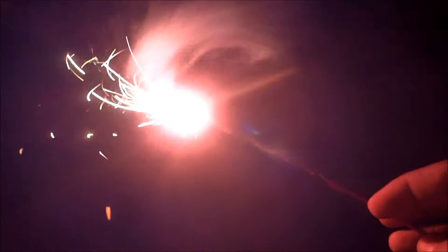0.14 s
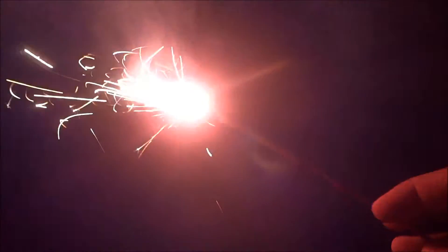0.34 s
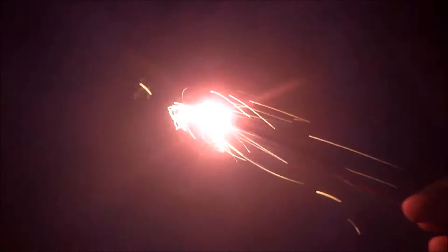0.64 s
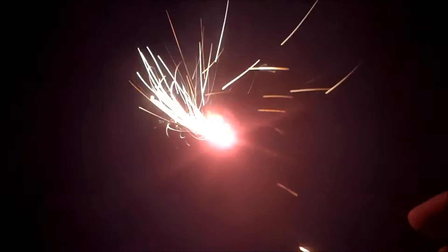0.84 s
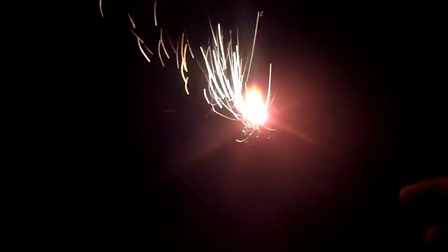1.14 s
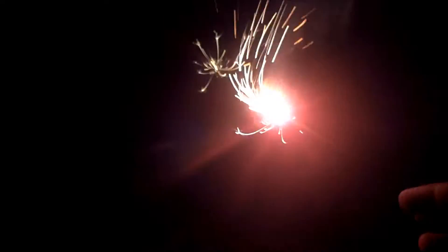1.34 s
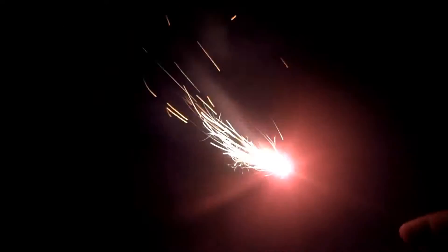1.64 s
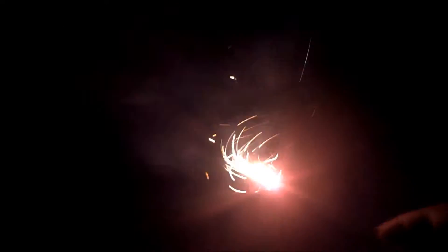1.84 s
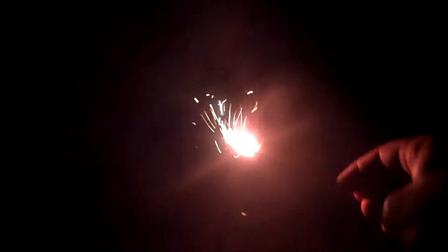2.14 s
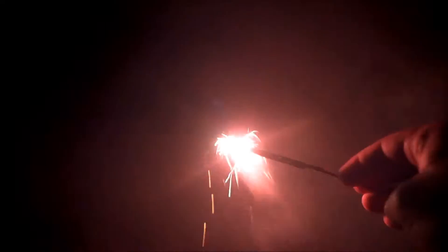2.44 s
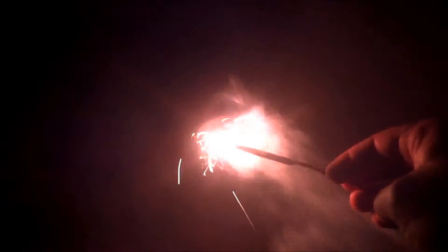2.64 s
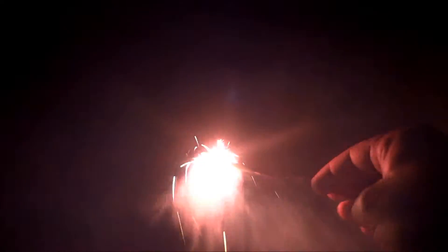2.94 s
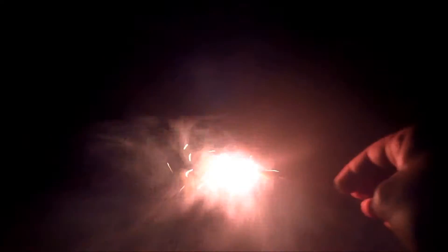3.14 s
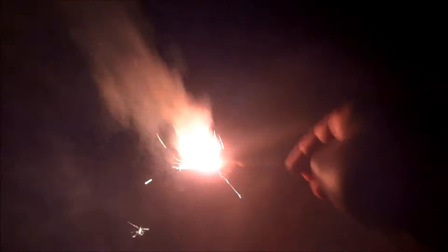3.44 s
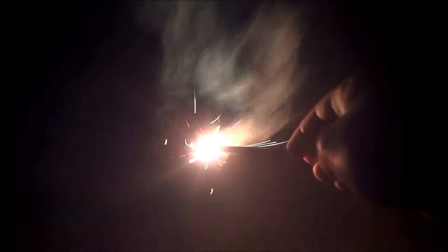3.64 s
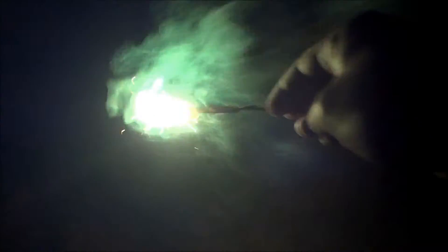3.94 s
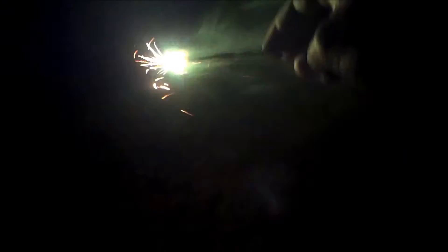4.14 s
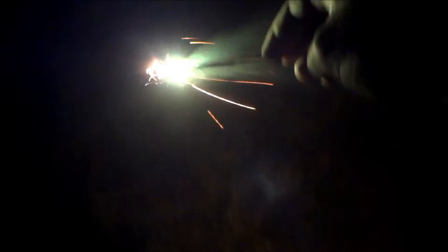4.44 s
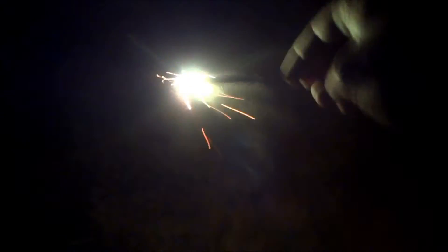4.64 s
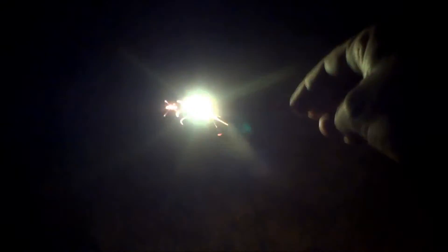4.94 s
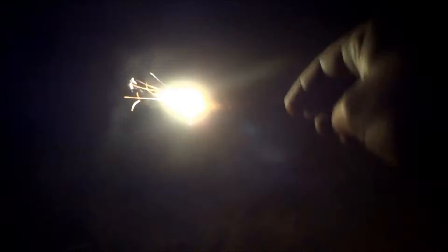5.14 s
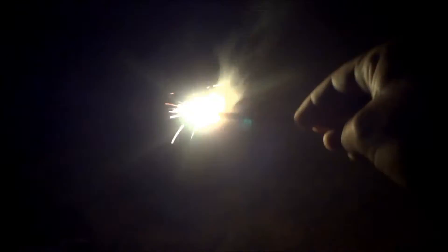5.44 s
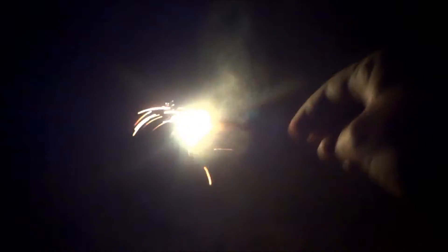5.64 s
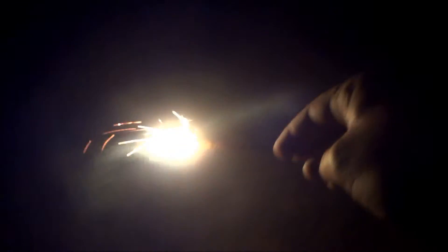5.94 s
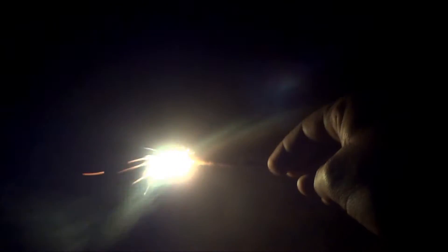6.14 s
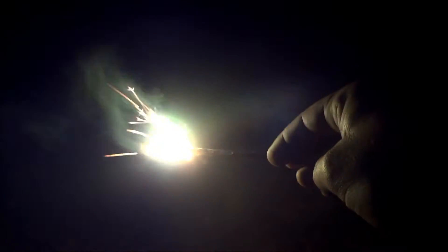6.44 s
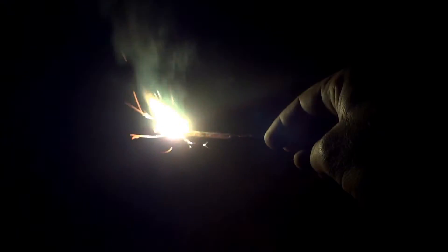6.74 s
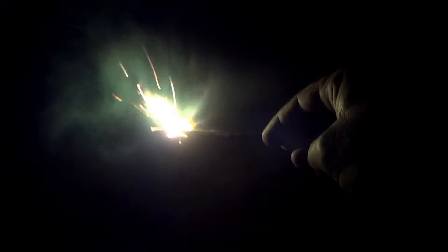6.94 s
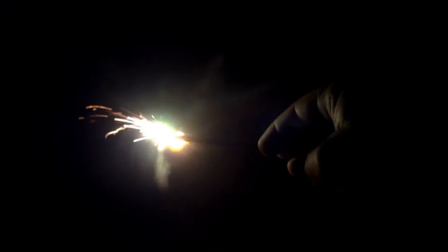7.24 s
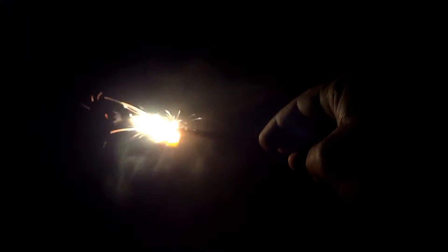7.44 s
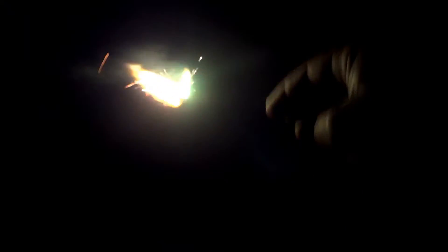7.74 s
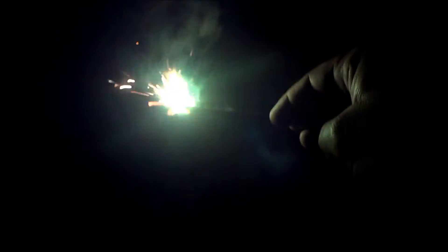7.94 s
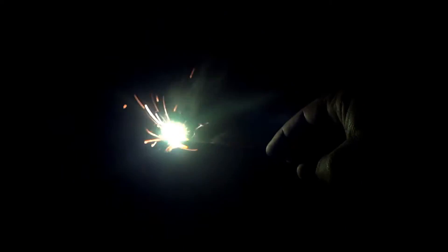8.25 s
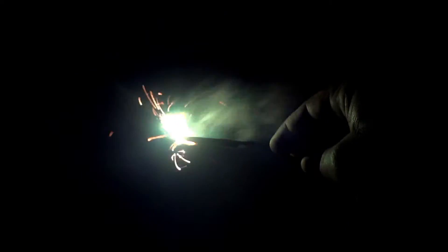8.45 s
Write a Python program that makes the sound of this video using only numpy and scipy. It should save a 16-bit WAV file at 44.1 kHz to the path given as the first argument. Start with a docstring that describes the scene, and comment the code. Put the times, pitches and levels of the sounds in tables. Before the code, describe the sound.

A sparkler burns close to a small stereo microphone outdoors. A gritty, bright hiss runs throughout over a soft low flame roar. Sharp cracks and tiny snaps pepper the first two seconds. Wind buffets hard near half a second and again around five seconds, briefly ducking the hiss. The fizz later turns smoother, with short swelling sputters ending in spits.

```python
"""A close, gritty hiss comes first: the gas jet of a hand-held colour sparkler burning outdoors at night.
Noise and random grains make the jet, with a new tone for each layer of the charge; low noise is the flame's roar.
Sparks crack as filtered pulses, and sputters swell as noise that ends in a short spit.
Puffs of wind, low noise with a brighter rush, buffet the microphone; the strongest make a limiter duck the hiss.
A faint, narrow band of noise hums behind it all."""
import sys
import numpy as np
from scipy import signal
from scipy.fft import rfft, irfft, next_fast_len
from scipy.io import wavfile
from scipy.ndimage import uniform_filter1d, minimum_filter1d, map_coordinates

SR = 44100
rng = np.random.default_rng(int(sys.argv[2]) if len(sys.argv) > 2 else 0)


def dump(signal):
    """Clip the signal to [-1, 1] and save it as 16-bit WAV at the path in sys.argv[1]."""
    limited = np.clip(np.atleast_2d(signal).T, -1, 1)
    pcm = np.round(limited * 32767).astype(np.int16)
    wavfile.write(sys.argv[1], SR, pcm)


N = 379701

T = np.arange(N) / SR
SIZE = next_fast_len(N + 4096)   # padded transform length
HZ = np.maximum(np.arange(SIZE // 2 + 1) * SR / SIZE, 1)
CUTOFF_HZ = 11080   # upper limit of the whole sound
LEFT_RIGHT = np.array([[1], [-1]])   # a positive left-right level makes the left louder

# Level of the hiss as heard, before trims; it dips under the strongest wind near 0.5 and 5 s:
# (time [s], hiss level [dB], level of the sizzle at the top [dB])
HISS_LEVEL = [(0.0, -38.5, -43.5), (0.25, -34, -37), (0.5, -38.5, -43), (0.8, -34.5, -38.5),
              (2.6, -42, -45), (3.6, -41, -47), (4.45, -38.5, -50.5), (4.7, -40.5, -48.5),
              (4.83, -42.5, -45.5), (5.0, -47, -48.5), (5.4, -44, -47), (5.85, -44.5, -42.5),
              (7.82, -42.5, -43), (7.89, -41, -38.5), (8.6, -40, -33)]
# The top fades as the jet swings away: (time [s], half width [s], loss of sizzle [dB])
SWINGS = [(2.72, 0.055, 9.5), (3.08, 0.042, 12.5), (3.37, 0.089, 14), (3.55, 0.092, 14),
          (4.059, 0.082, 9.5)]
SWING_HISS_SHARE = 0.16   # part of that loss, in dB, which the lower hiss shares
# The jet flares up for an instant: (time [s], half width [s], rise of the hiss [dB])
FLARES = [(4.692, 0.019, 10)]


def jet(flicker_db, flutter_db, sway_db, hiss_db, sizzle_db):
    """Hiss and sizzle follow level curves and a flickering burn; the sizzle fades most when the jet points away."""
    tone = hiss_tone(echo_s=1 / 535, change_s=0.17)
    low = through(tone, below(7920, order=14))
    hiss_curve, sizzle_curve = in_time(HISS_LEVEL)

    swing_db = sum(loss_db * bump(s, width) for s, width, loss_db in SWINGS)
    away_db = swing_db + sway_db * drift(2.5)
    burn = from_db(flicker_db * drift(15.2) + flutter_db * drift(115))
    flare_db = sum(rise_db * bump(s, width) for s, width, rise_db in FLARES)

    hiss_gain = from_db(hiss_curve + hiss_db + flare_db - SWING_HISS_SHARE * away_db)
    hiss = hiss_gain * evened(low)
    sizzle = from_db(sizzle_curve + sizzle_db - away_db) * evened(tone - low)
    return slid(burn * (hiss + sizzle))


# Tone of the jet while each layer burns: (frequency [Hz], spectrum level [dB per Hz])
RED = [(1700, -27), (2400, -9), (2900, -16.5), (3400, 1.5), (3850, -4), (4350, 1), (5400, 1.5), (6300, -4),
       (7400, 3), (8600, -4), (9600, -1.5), (11000, -9)]
FADING_RED = [(1600, -24), (2170, -13.5), (3000, -12.5), (3470, -1), (4000, -2), (5070, 2), (8850, -7),
              (11000, -15.5)]
GREEN = [(1600, -14.5), (2550, -22.5), (3420, -5.5), (3750, -6), (4950, 0), (5650, -9), (6000, -10),
         (6500, -1.5), (7700, -4), (9000, -13.5), (11000, -10)]
WHITE = [(1600, -4), (2160, -11), (2500, -5), (4210, -5), (5280, -5), (6300, -3.5), (7290, 0.5), (9360, 3),
         (10200, 2), (11000, -7.5)]
LAST_GREEN = [(1600, -13.5), (2200, -20.5), (2550, -15), (4500, -9), (5650, -5.5), (6100, -19), (6550, -3),
              (7500, 2.5), (8400, 4), (9120, -9.5), (9700, 1.5), (11000, -1.5)]
TONES = [RED, FADING_RED, GREEN, WHITE, LAST_GREEN]
# The layers in that order: (start [s], grains over gas [dB], echo share [0-1], left-right level [dB],
# extra left-right level in the middle range [dB])
LAYERS = [(0.0, 2, 0.06, -1.2, 0), (2.7, -0.5, 0, -1.5, 1), (4.02, -2.5, 0, -1.8, 3),
          (4.82, -10.5, 0.54, 1, 7), (7.84, -2, 0.2, 0.4, 22.5)]
# The last green layer sinks in tone as the hand turns the stick: (time [s], factor on all frequencies [ratio])
LAST_GLIDE = [(8.15, 1.0), (8.61, 0.94)]
GLIDES = [None, None, None, None, LAST_GLIDE]
PORT_LEAD_RAD = 0.83   # the right port leads in phase


def hiss_tone(echo_s, change_s):
    """Gas noise and grains, coloured by the burning layer; the last layer glides as the stick turns."""
    gas = stereo_noise(side_db=-14)
    spit = grains(per_s=1500, spread_db=1.5)
    later = [np.clip((T - row[0]) / change_s + .5, 0, 1) for row in LAYERS[1:]]
    reached = [np.ones(N)] + later + [np.zeros(N)]

    middle = np.exp(-np.log2(HZ / 2300) ** 2)   # this range leans further to one side
    echo_band = below(7600, order=12) * (1 - below(4200, order=8))
    echo = np.exp(-2j * np.pi * HZ * echo_s) * echo_band   # off the hand
    span = (1 - below(1350, order=10)) * below(CUTOFF_HZ + 700, order=40)

    out = 0
    for k, (_, grain_db, echo_share, pan_db, shade_db) in enumerate(LAYERS):
        share = np.sqrt(np.maximum(reached[k] - reached[k + 1], 0))   # crossfade at equal power
        tone = span * colour(TONES[k]) * (1 + echo_share * echo)
        tone = tone * ports(PORT_LEAD_RAD, pan_db + shade_db * middle)
        layer = rms_one(through(gas + from_db(grain_db) * spit, tone))
        out = out + share * glided(layer, GLIDES[k])
    return out


def grains(per_s, spread_db):
    """Metal grains ignite at random, many small and a few large."""
    sizes = from_db(spread_db * np.minimum(rng.exponential(1, N), 4.5)) * rng.choice([-1, 1], N)
    return rms_one(sizes * (rng.random(N) < per_s / SR))


def glided(x, curve):
    """Read a steady hiss faster or slower, which moves all its peaks and hollows together."""
    if curve is None:
        return x
    place = np.cumsum(in_time(curve)[0]) % (N - 1)
    return np.array([map_coordinates(channel, [place], order=3, mode="nearest") for channel in x])


# A hollow in the hiss slides as the hand moves; negative depth lifts: (time [s], centre [Hz], depth [dB])
HOLLOW = [(4.65, 2600, -5), (4.9, 2880, 9.5), (5.5, 3230, 9.5), (6.2, 3520, 10.5), (7.5, 3350, 13.5),
          (8.6, 3100, 5.5)]
# A bright band sweeps through the hiss; negative lift cuts: (time [s], centre [Hz], lift [dB])
BRIGHT = [(3.7, 4600, -1), (3.92, 8650, 4.5), (4.05, 10500, 7.5), (4.5, 6450, -0.5), (4.9, 8400, 7),
          (5.2, 10800, 6.5), (5.3, 8040, -0.5), (5.6, 11400, 5), (6.05, 9000, 1)]
HOLLOW_HALF_WIDTH_HZ, BRIGHT_HALF_WIDTH_HZ = 552, 730


def slid(x, size=512):
    """Direct and reflected sound cancel in one band and add in another; both slide with the hand."""
    hz, s, frames = signal.stft(x, SR, nperseg=size)
    lift_db = sliding_band(BRIGHT, BRIGHT_HALF_WIDTH_HZ, hz, s, order=2)
    depth_db = sliding_band(HOLLOW, HOLLOW_HALF_WIDTH_HZ, hz, s, order=4)
    return signal.istft(frames * from_db(lift_db - depth_db), SR, nperseg=size)[1][:, :N]


def sliding_band(curve, half_width_hz, hz, s, order):
    """Height in dB of a moving band at given frequencies and moments; a higher order gives steeper edges."""
    times, centre_hz, db = np.transpose(curve)
    distance = (hz[:, None] - np.interp(s, times, centre_hz)) / half_width_hz
    return np.interp(s, times, db) * np.exp(-distance ** order)


# Bursting sparks, before trim: (time [s], peak level [dB])
CRACKS = [(0.205, -20), (0.314, -27.5), (0.361, -14.5), (0.6988, -25), (0.882, -18), (1.2895, -19),
          (1.325, -23), (1.6676, -17.5), (1.773, -19), (2.0353, -15), (2.547, -20), (2.823, -20),
          (7.93, -23.5)]
SHOWER_END_S = 2.1   # small sparks burst until then


def cracks(level_db, small_db):
    """A bursting spark is one sharp bright pulse; the red fire throws many smaller ones at random."""
    s, db = np.transpose(CRACKS)
    when, size = rng.random((2, 26))
    times = np.r_[s, when * SHOWER_END_S]
    levels_db = np.r_[db + level_db, small_db + 5 * size]
    tone = colour([(300, -34), (1800, -16.5), (3500, -8.5), (7500, 0), (11000, -11.5)])   # (Hz, dB)
    return snaps(times, levels_db, tone)


def snaps(times, levels_db, response):
    """Single pressure pulses, each set to its peak level before the ports shift and pan it."""
    clicks = np.zeros(N)
    places = np.clip(np.round(np.asarray(times) * SR).astype(int), 0, N - 1)
    clicks[places] = from_db(levels_db)
    response = response * below(CUTOFF_HZ, order=40)
    ahead = ports(lead=.7, pan_db=-1.5)
    return through(clicks, response * ahead) / np.abs(irfft(response, SIZE)).max()


# Gas pockets that swell and blow out; a trim follows on the rush only:
# (end [s], swell time constant [s], rush level [dB], final spit level [dB], top of the spit [Hz])
SPUTTERS = [(3.142, 0.002, -47.5, -37, 3500), (4.526, 0.003, -33, -36.5, 4900),
            (4.782, 0.017, -36, -49, 4200), (5.995, 0.051, -30, -32.5, 5400),
            (7.827, 0.024, -28, -29.5, 4800)]
# Tone of the rush: (frequency [Hz], spectrum level [dB per Hz])
SPUTTER_TONE = [(200, 0), (700, 14), (1800, 5), (2600, 6.5), (4400, 8), (6000, 4), (11000, 0)]
SPIT_S, SPIT_LOW_HZ = 0.0018, 2500   # half width and lower edge of the spit


def sputters(level_db):
    """Trapped gas rushes out ever harder, then ends in a short, crisp spit with a pitch of its own."""
    gas = stereo_noise(side_db=-5.5)
    rush = rms_one(through(gas, colour(SPUTTER_TONE)))
    swell, spits = 0, 0
    for end, length, rush_db, spit_db, top_hz in SPUTTERS:
        fade_s = np.where(T < end, length, .002)   # the rush stops fast after its end
        swell = swell + from_db(rush_db) * np.exp(-np.abs(T - end) / fade_s)
        crisp = evened(through(gas, band(SPIT_LOW_HZ, top_hz)), size=SR // 300)
        spits = spits + from_db(spit_db) * bump(end, SPIT_S) * crisp
    return from_db(level_db) * swell * rush + spits


# Low roar of the flame, levels before trims:
# (time [s], roar level [dB], upper edge level [dB], left-right level [dB])
FLAME = [(0.3, -43.5, -44, -1.5), (3.6, -47, -50, -2), (4.3, -43.5, -46, -1.5), (5.8, -44.5, -54, 3.5),
         (8.1, -47, -51.5, 5), (8.5, -44.5, -46.5, 8)]
# Tone of the roar: (frequency [Hz], spectrum level [dB per Hz])
FLAME_TONE = [(26, -53), (45, -22), (170, -10), (472, -9), (618, -6.5), (964, -2), (1300, -5.5),
              (1600, -15), (2000, -16), (3000, -59.5)]


def flame(roar_db, edge_db, waver_db):
    """The soft roar under the hiss; its upper edge is stronger in the red fire, and it drifts to the left."""
    lead = 1.23 * (1 - below(790, order=4))
    roar = through(stereo_noise(side_db=-9.0), colour(FLAME_TONE) * ports(lead, pan_db=0))
    low = through(roar, below(945, order=12))
    roar_curve, edge_curve, pan_curve = in_time(FLAME)
    body = from_db(roar_curve + roar_db) * rms_one(low)
    edge = from_db(edge_curve + edge_db) * rms_one(roar - low)
    return from_db(waver_db * drift(26) + pan_curve * LEFT_RIGHT / 2) * (body + edge)


# Tone of the wind: (frequency [Hz], spectrum level [dB per Hz])
WIND_TONE = [(25, -40), (53, -13), (144, 3), (238, 2.5), (350, 1), (715, -12), (1430, -33), (3000, -74.5)]
# The sharpest puffs whip across the ports: (time [s], level [dB])
WHIPS = [(0.385, -34), (0.417, -28), (4.965, -37)]
WHIP_S, WHIP_BAND_HZ = 0.0058, (870, 1700)   # half width and range of a whip


def wind(body_db, rush_db):
    """Turbulence on the ports: a low body, a rush above it, and a brief whip in the sharpest puffs."""
    body, rush = wind_power(lumpy_db=4)
    mid, side = rng.standard_normal((2, N))
    tone = colour(WIND_TONE)
    apart = 1 - below(142, order=2)   # the longest waves press on both ports alike
    air = through(mid, tone * ports(lead=-1.5 * apart, pan_db=0))
    air = air + through(side, .5 * tone * apart) * LEFT_RIGHT
    low = through(air, below(336, order=8))

    thumps = from_db(body_db) * np.sqrt(body) * evened(low, size=SR // 40)
    thumps = thumps + from_db(rush_db) * np.sqrt(rush) * evened(air - low, size=SR // 60)
    lash = rms_one(through(stereo_noise(side_db=4), band(*WHIP_BAND_HZ)))
    whips = sum(from_db(db) * bump(s, WHIP_S) for s, db in WHIPS) * lash
    return through(thumps, 1 - below(23, order=4)) + whips


# Gusts of wind on the microphone, before flutter and trims: (start [s], hold [s], body level [dB])
GUSTS = [(0.42, 0.21, -39.5), (1.04, 0.45, -49.5), (3.016, 0.096, -46.5), (4.304, 0.035, -50.5),
         (4.559, 0.25, -34.5), (4.88, 0.23, -37.5), (5.296, 0.13, -39), (6.93, 0.18, -45),
         (7.772, 0.065, -44)]
# Single eddies that slap the ports, before trims:
# (time [s], half width of the power bell [s], body level [dB], rush level [dB])
EDDIES = [(0.139, 0.0063, -30.5, -29.5), (0.383, .004, -30, -27), (0.414, 0.011, -36, -22.5),
          (0.433, 0.012, -23, -19.5), (0.462, 0.006, -29, -26), (0.475, 0.0023, -27, -11.5),
          (0.502, 0.012, -42, -24), (0.517, 0.0096, -22, -14.5), (0.534, 0.0042, -30, -21),
          (0.557, 0.004, -24, -26.5), (0.591, 0.006, -25.5, -24.5), (0.651, .004, -30, -44),
          (0.697, 0.0058, -33, -40), (1.164, 0.018, -32.5, -58), (1.922, 0.01, -30.5, -35),
          (2.244, 0.015, -35, -32.5), (2.404, 0.012, -41.5, -52), (2.516, 0.0042, -36, -41),
          (3.041, 0.0042, -37.5, -53), (3.071, 0.0034, -37, -49), (4.59, 0.0067, -29, -25),
          (4.622, 0.01, -19.5, -21), (4.789, 0.0066, -25, -26), (4.823, 0.0059, -26, -29),
          (4.841, 0.0051, -37, -27), (4.96, 0.0082, -24, -22.5), (4.998, 0.006, -30, -17.5),
          (5.027, 0.0021, -40, -26), (5.047, 0.0062, -38, -21.5), (5.072, 0.0026, -34, -19),
          (5.155, 0.018, -32.5, -34.5), (5.32, 0.0067, -23.5, -36), (5.345, 0.0088, -25.5, -38),
          (5.447, 0.0022, -35, -51), (6.907, 0.00077, -28, -19), (6.929, 0.005, -33.5, -49),
          (6.975, 0.009, -36.5, -49), (7.047, 0.006, -33, -30.5), (7.067, 0.0046, -33, -36)]
GUST_ATTACK_S, GUST_RELEASE_S = 0.018, 0.096   # time constants of the gust's amplitude
GUST_FLUTTER_DB, GUST_FLUTTER_HZ = 3, 46   # a gust breaks up into thumps
# Gust level at which rush equals body before trims; dB the rush gains on the body per dB of gust
EVEN_RUSH_DB, RUSH_GROWTH = -32.5, 1.4


def wind_power(lumpy_db):
    """Power of body and rush: gusts rise, flutter and die, the stronger the brighter; eddies are brief bells."""
    body, rush = 0, 0
    flutter_db = GUST_FLUTTER_DB * drift(GUST_FLUTTER_HZ)
    lumps = from_db(2 * lumpy_db * drift(155))   # doubled decibels give power
    for start, hold, db in GUSTS:
        before = np.maximum(start - T, 0) / GUST_ATTACK_S
        after = np.maximum(T - start - hold, 0) / GUST_RELEASE_S
        shape = np.exp(-2 * np.minimum(before + after, 20))
        power = lumps * from_db(2 * (db + flutter_db)) * shape
        body = body + power
        rush = rush + power * from_db(2 * RUSH_GROWTH * (db - EVEN_RUSH_DB))
    for s, width, body_db, rush_db in EDDIES:
        bell = bump(s, width)
        body = body + from_db(2 * body_db) * bell
        rush = rush + from_db(2 * rush_db) * bell
    return body, rush


HUM_HZ, HUM_HALF_WIDTH_HZ, HUM_DB = 271.8, 6.6, -60


def hum():
    """A faint, slightly unsteady hum in the background: a very narrow band of noise."""
    line = np.exp(-((HZ - HUM_HZ) / HUM_HALF_WIDTH_HZ) ** 2)
    return from_db(HUM_DB) * evened(through(rng.standard_normal((1, N)), line), size=SR // 3)


def from_db(db):
    """Decibels to gain."""
    return 10 ** (np.asarray(db) / 20)


def rms_one(x):
    """Scale so that the centre of the stereo image has rms 1."""
    return x / np.sqrt(np.mean(np.atleast_2d(x).mean(axis=0) ** 2) + 1e-20)


def evened(x, size=SR // 7):
    """Hold the centre of the stereo image near rms 1 over a window of so many samples."""
    return x / np.sqrt(uniform_filter1d(x.mean(axis=0) ** 2, size=size) + 1e-12)


def in_time(rows):
    """Each column of a curve at every sample."""
    s, *columns = np.transpose(rows)
    return [np.interp(T, s, c) for c in columns]


def bump(s, half_width):
    """A bell of height 1 around a moment, down to 1/e at the half width."""
    return np.exp(-np.minimum(((T - s) / half_width) ** 2, 40))


def drift(rate_hz):
    """Slow chance with spread 1: noise smoothed by two equal poles at rate_hz, drawn every 20 samples."""
    r = np.exp(-40 * np.pi * rate_hz / SR)
    noise = rng.standard_normal(N // 20 + 2002)
    slow = signal.lfilter([1], [1, -2 * r, r * r], noise)[2000:]   # skip the filter's start
    return np.interp(np.arange(N) / 20, np.arange(len(slow)), rms_one(slow))


def stereo_noise(side_db):
    """White noise with a part that differs between the ports."""
    mid, side = rng.standard_normal((2, N))
    return mid + from_db(side_db) * side * LEFT_RIGHT


def ports(lead, pan_db):
    """Responses of the two microphone ports: the right leads in phase [rad], the levels differ."""
    return from_db(LEFT_RIGHT * pan_db / 2) * np.exp(-1j * LEFT_RIGHT * lead / 2)


def colour(points):
    """Causal (minimum-phase) response that follows a spectrum."""
    hz, db = np.transpose(points)
    cepstrum = irfft(np.log(from_db(np.interp(np.log(HZ), np.log(hz), db))), SIZE)
    cepstrum[1:SIZE // 2] *= 2   # fold the time before zero onto the time after
    cepstrum[SIZE // 2 + 1:] = 0
    return np.exp(rfft(cepstrum))


def below(edge_hz, order):
    """Low-pass response; one minus it is the matching high-pass."""
    return 1 / (1 + (HZ / edge_hz) ** order)


def band(low_hz, high_hz):
    """Response that passes one band."""
    return below(high_hz, order=7) * (1 - below(low_hz, order=8))


def through(x, response):
    """Filter a sound by a response."""
    return irfft(rfft(x, SIZE) * response, SIZE)[..., :N]


def scene():
    """The sparkler in front of the microphone, the wind on it, and a faint hum."""
    sparkler = jet(flicker_db=1.26, flutter_db=0.97, sway_db=1.24, hiss_db=-1.26, sizzle_db=-1.8)
    sparkler = sparkler + flame(roar_db=-3.5, edge_db=-2.0, waver_db=1.5)
    sparkler = sparkler + cracks(level_db=3.5, small_db=-21.5) + sputters(level_db=-5.5)
    return sparkler + wind(body_db=-0.9, rush_db=-2.5) + hum()


def limiter(x, ceiling_db, release_db_per_s):
    """Loud swings, averaged over about a millisecond, turn everything down; the gain then creeps back."""
    level = uniform_filter1d(np.abs(x).max(axis=0), size=55)
    over = np.maximum(20 * np.log10(np.maximum(level, 1e-9)) - ceiling_db, 0)
    release = release_db_per_s * T
    held = np.maximum.accumulate(over + release) - release
    gain_db = uniform_filter1d(minimum_filter1d(-held, size=45), size=45)
    return x * from_db(gain_db)


def record(dry):
    """The limiter, then the recorder's narrow bandwidth."""
    limited = limiter(dry, ceiling_db=-17.5, release_db_per_s=399)
    return through(limited, below(CUTOFF_HZ, order=240))


dry = scene()
out = record(dry)
dump(out)
```